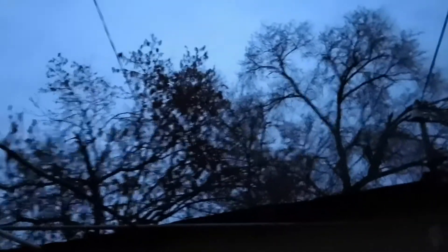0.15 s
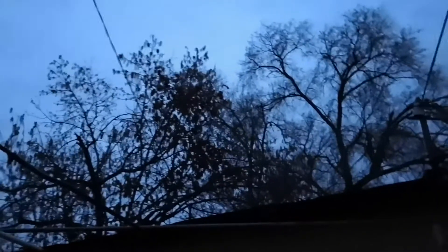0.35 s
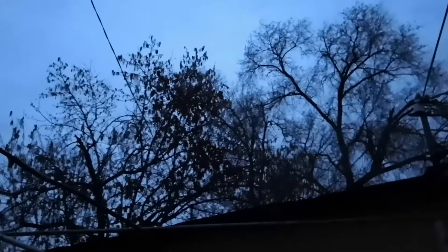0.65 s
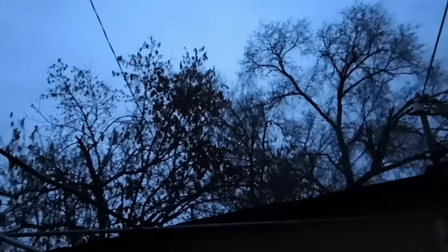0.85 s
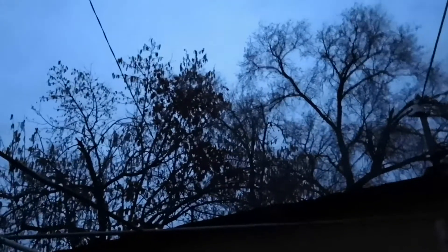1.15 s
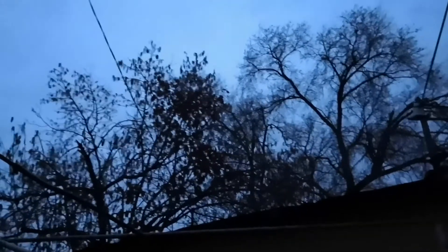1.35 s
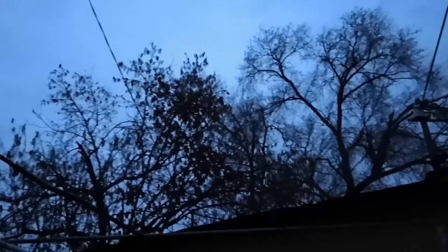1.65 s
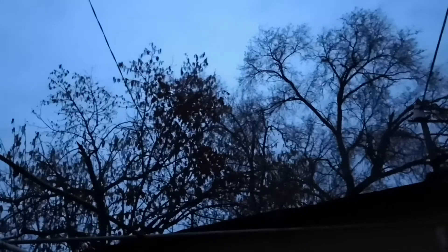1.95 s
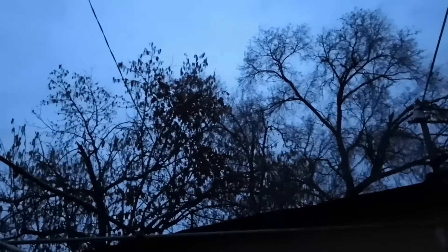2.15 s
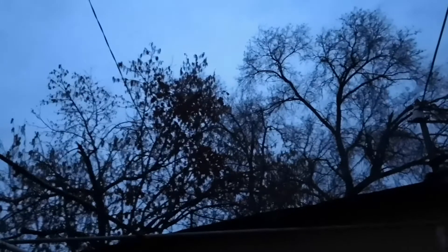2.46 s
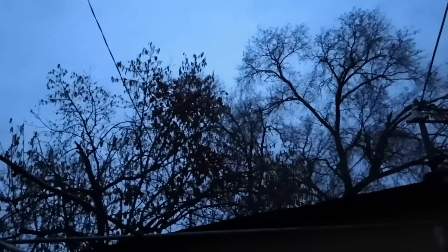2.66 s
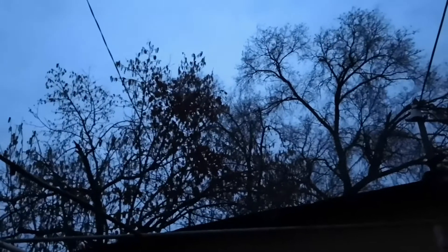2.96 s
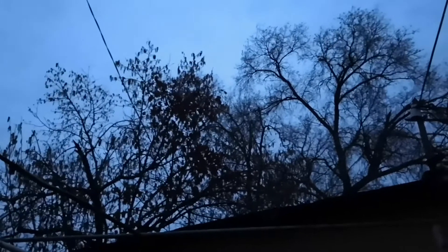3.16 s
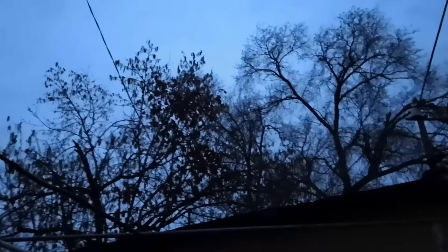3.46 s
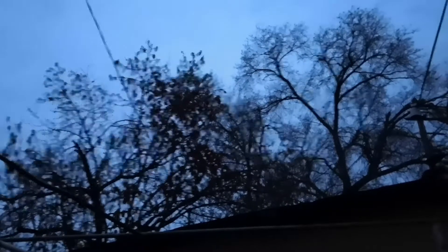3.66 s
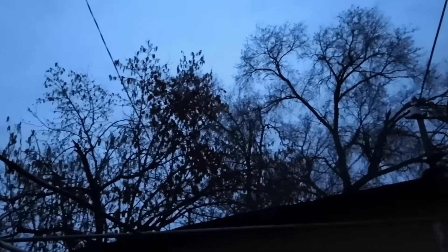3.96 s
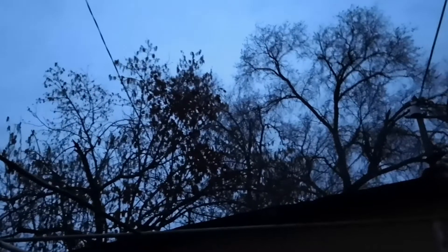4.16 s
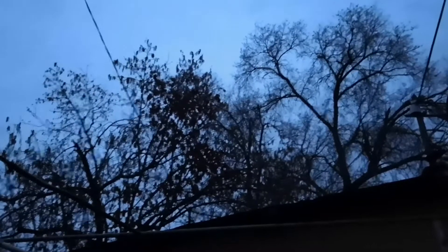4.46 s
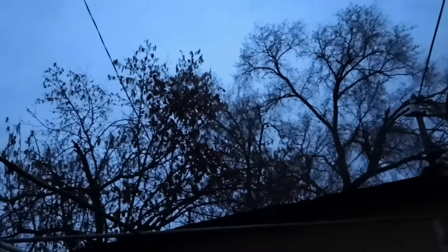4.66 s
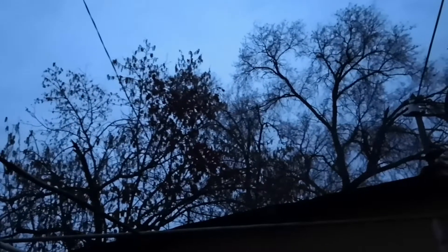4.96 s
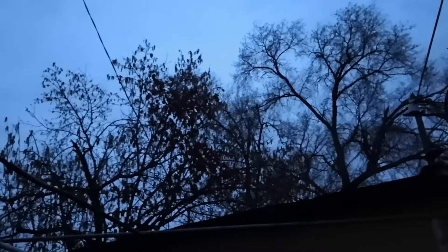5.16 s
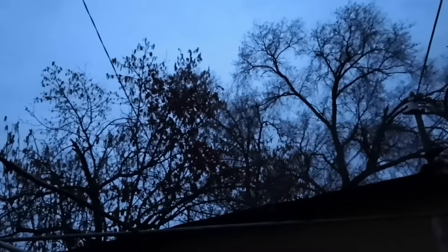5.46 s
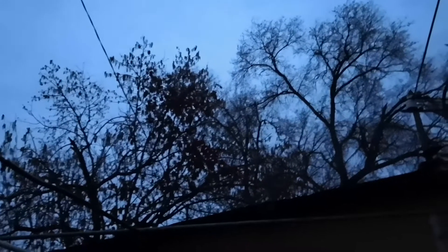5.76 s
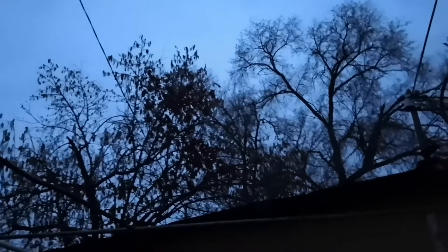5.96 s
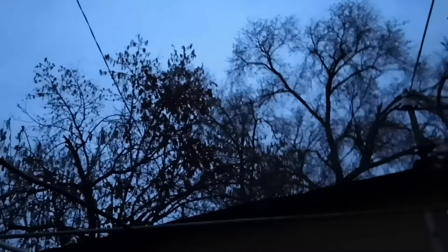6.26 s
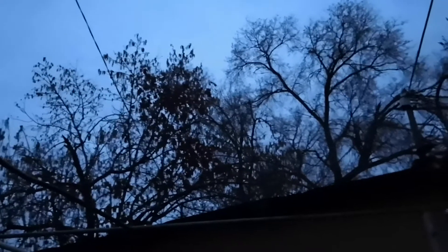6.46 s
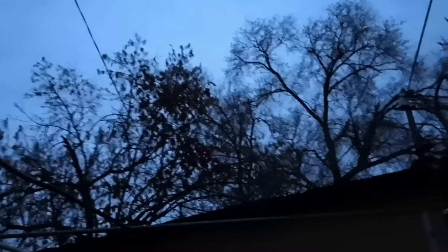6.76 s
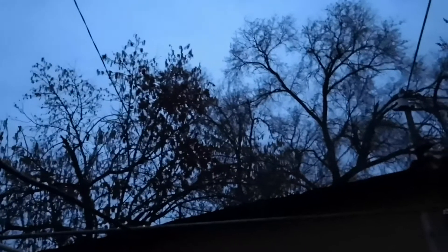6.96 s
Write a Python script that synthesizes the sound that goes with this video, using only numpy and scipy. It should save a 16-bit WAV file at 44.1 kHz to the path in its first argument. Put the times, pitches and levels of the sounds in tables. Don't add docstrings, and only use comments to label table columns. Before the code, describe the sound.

A blackbird sings from a bare tree some way off, slightly left. Blurred distant bird murmurs come first, then short mellow whistles and warbles, a run of tiny falling squeaks, and a long rising whistle with a high trill, repeated louder. A dense loud phrase ends in thin hooked squeaks. Walls echo every note; faint town hum, far birds and soft regular ticks lie beneath a small stereo handheld microphone.

```python
import sys
import numpy as np
from scipy import signal
from scipy.io import wavfile
from scipy.ndimage import uniform_filter1d

SR = 44100
rng = np.random.default_rng(int(sys.argv[2]) if len(sys.argv) > 2 else 0)


def digitize_waveform(pressure):
    field = np.atleast_2d(pressure).T
    bounded = np.clip(field, -1, 1)
    quanta = np.round(bounded * 32767).astype(np.int16)
    wavfile.write(sys.argv[1], SR, quanta)


def decibels_to_gain(level_db):
    exponent = np.asarray(level_db, float) / 20
    return 10 ** exponent


N = 313992


def evened(x):
    return x / np.sqrt(np.mean(x ** 2) + 1e-20)


def read(points, hz):
    f, value = np.transpose(points)
    return np.interp(np.log(hz + 1), np.log(f + 1), value)


def add(mix, s, sound):
    part = mix[..., round(s * SR):][..., :sound.shape[-1]]
    part += sound[..., :part.shape[-1]]


# (frequency [Hz], density [dB per Hz])
HUM = [(12, -35), (20, -7.5), (120, 5), (160, -17), (181, 9), (238, -7), (335, -14), (367, -11.5),
       (619, -26), (702, -6.5), (769, -18.5), (857, -14), (1500, -16), (1950, -44), (3300, -120)]
# (frequency [Hz], density [dB per Hz])
AIR = [(880, -11), (1500, -6), (1690, 2.5), (1840, 2.5), (2280, -0.5), (2450, 0), (3160, -3), (3450, -8),
       (4360, -16.5), (4850, -14.5), (5400, -11.5), (6380, -18), (7250, -15), (8230, -20.5), (15600, -28.5)]
# (frequency [Hz], likeness [0-1])
PORT_LIKENESS = [(30, .999), (80, .995), (170, .93), (350, .75), (700, .68), (1400, .52), (3000, .5),
                 (8000, .35), (14000, .1)]
# (frequency [Hz], left-right level [dB])
PORT_LEAN = [(200, -0.5), (400, -0.5), (700, 7), (1200, -1.5), (2400, -1), (4400, -2), (8000, 1),
             (12000, 1)]
# (frequency [Hz], phase [rad])
PORT_TWIST = [(60, -.05), (170, -.1), (300, .45), (600, 1.3), (900, 0), (1300, -1.4), (2200, -1), (3000, 0)]
HUM_DB, AIR_DB = -59, -63
PORT_LAG = 16
SWELL_DB, PATCH_DB, CHORUS_DB = .5, 1.64, 1.6


def town():
    frames, hz = N // 256 + 5, np.fft.rfftfreq(1024, 1 / SR)[:, None]
    a, b, c, d, patches, swell = rng.standard_normal((frames, 513, 6)).T
    patches = uniform_filter1d(patches, size=3, axis=0)
    patches = evened(uniform_filter1d(patches, size=24, axis=1))
    swell = evened(uniform_filter1d(swell[0], size=90))
    chorus = np.exp(-(np.log((hz + 1) / 2200) / .5) ** 2)

    same = np.clip(read(PORT_LIKENESS, hz), 0, 1)
    lean = decibels_to_gain(.5 * read(PORT_LEAN, hz))
    lead = 2 * np.pi * hz * PORT_LAG / SR + read(PORT_TWIST, hz)
    right = a + 1j * b
    left = same * np.exp(1j * lead) * right + np.sqrt(1 - same ** 2) * (c + 1j * d)
    summed = np.sqrt(lean ** 2 + lean ** -2. + 2 * same * np.cos(lead)) / 2

    hum = decibels_to_gain(HUM_DB) * evened(decibels_to_gain(read(HUM, hz)))
    air = decibels_to_gain(AIR_DB) * evened(decibels_to_gain(read(AIR, hz)))
    shape = np.hypot(hum, air)
    motion_db = (PATCH_DB + CHORUS_DB * chorus) * patches + SWELL_DB * swell
    colour = shape * decibels_to_gain(motion_db) / summed
    spectra = np.array([lean * left, right / lean]) * colour
    pair = signal.istft(spectra, nperseg=1024, noverlap=768)[1][:, :N]
    return np.sqrt(np.mean(shape ** 2)) * pair / np.std(pair.mean(0))


# (time [s], peak level [dB])
TICKS = [(0.159, -66.5), (0.7794, -63.5), (1.4391, -65.5), (1.9894, -64.5), (2.6256, -65.5), (3.238, -63),
         (3.8228, -66.5), (4.4428, -67), (5.0294, -64.5), (5.6302, -66.5), (6.2346, -79), (6.8366, -70)]
# (frequency [Hz], level [dB], decay t60 [s])
TICK_MODES = [(1880, 20, 0.006), (3280, -8, 0.0033), (5400, -10.5, 0.012), (7000, -21, 0.012),
              (8500, -12.5, 0.0075)]


def ticks():
    t, out = np.arange(1500) / SR, np.zeros((2, N))
    ring = sum(decibels_to_gain(db - 60 * t / t60) * np.sin(2 * np.pi * hz * t) for hz, db, t60 in TICK_MODES)
    ring[0] = 1.5
    for (s, db), rattle in zip(TICKS, rng.standard_normal((len(TICKS), 2, 1500))):
        shake = np.diff(rattle, prepend=0) * decibels_to_gain(-60 * t / 0.065)
        add(out, s, decibels_to_gain(db - 0.5) * signal.fftconvolve(shake, ring[None], axes=1))
    return out


# (start [s], length [s], centre [Hz], swing depth [Hz], level [dB])
FAR = [
    (0.096, 0.23, 1290, 90, -60),
    (0.227, 0.12, 1800, 90, -64),
    (0.456, 0.2, 2052, 110, -56),
]
FAR_SWELL_DB = -7.5


def distant(start, length, hz, depth_hz, db):
    return [(start, hz, db + FAR_SWELL_DB, depth_hz),
            (start + .7 * length, hz, db, depth_hz),
            (start + length, hz, db + FAR_SWELL_DB, depth_hz)]


# (start [s], length [s], from [Hz], to [Hz], level [dB])
WHISTLES = [(0.77, 0.042, 2252, 2213, -45), (0.869, 0.094, 2238, 2096, -45.5),
            (0.831, 0.023, 2684, 2660, -55), (1.078, 0.095, 1919, 1836, -46.5),
            (1.221, .105, 2717, 2925, -53), (1.865, 0.05, 1917, 2072, -53),
            (3.192, 0.063, 2592, 2626, -50.5), (3.328, 0.052, 2310, 2250, -57.5),
            (3.653, 0.22, 2805, 2940, -69), (4.475, 0.058, 2500, 2530, -49.5),
            (4.698, 0.048, 2717, 2726, -47.5), (5.096, 0.097, 2170, 2325, -63),
            (5.385, 0.066, 2200, 2376, -56), (5.439, 0.067, 2380, 2453, -42),
            (5.748, 0.23, 2044, 2098, -48), (5.82, 0.122, 2400, 2450, -40.5), (6.027, .14, 6720, 6680, -71),
            (6.134, 0.075, 3110, 3248, -43), (6.346, 0.032, 2498, 2480, -50),
            (6.374, 0.051, 2049, 2090, -49), (6.539, 0.066, 2085, 2070, -41.5)]
# (start [s], length [s], from [Hz], to [Hz], level [dB])
REEDS = [
    (3.158, 0.055, 2103, 1918, -51.5),
    (4.663, 0.066, 2117, 1922, -52.5),
    (6.008, .135, 2717, 2994, -49),
]
# (start [s], length [s], from [Hz], to [Hz], level [dB])
NASALS = [
    (3.091, .07, 3150, 2820, -57),
    (4.589, .075, 3198, 2880, -54),
]
SCOOP_S, SCOOP, SCOOP_DB = 0.0135, 0.0595, -6.5
TREMBLE_HZ, TREMBLE_PER_S, NASAL_HZ, NASAL_PER_S = 21, 30.8, 50, 65
WHISTLE_FADE_DB = -0.5


def whistle(start, length, from_hz, to_hz, db, tremble_hz=TREMBLE_HZ):
    return [(start, from_hz * (1 - SCOOP), db + SCOOP_DB, tremble_hz),
            (start + SCOOP_S, from_hz, db, tremble_hz),
            (start + length, to_hz, db + WHISTLE_FADE_DB, tremble_hz)]


# (start [s], length [s], centre [Hz], swing depth [Hz], level [dB])
WARBLES = [
    (0.637, 0.085, 2670, 143, -55),
    (0.699, 0.22, 2420, 173, -54),
    (1.322, 0.11, 2800, 170, -53.5),
    (5.511, 0.16, 2298, 324, -43.5),
    (6.438, 0.11, 2243, 285, -43.5),
]
WARBLE_PER_S, WARBLE_OPENS, WARBLE_FADE_DB = 45, 0.346, -4.5


def warble(start, length, hz, depth_hz, db):
    return [(start, hz, db + 2, 0.39 * depth_hz),
            (start + WARBLE_OPENS * length, hz, db, depth_hz),
            (start + length, hz, db + WARBLE_FADE_DB, depth_hz)]


# (start [s], length [s], from [Hz], to [Hz], peak level [dB])
RISES = [
    (2.718, .295, 1840, 2476, -43),
    (4.215, .26, 1880, 2498, -39.5),
]
RISE_BEND, RISE_PEAK = 1.45, .8
RISE_GROW_DB, RISE_FADE_DB = -14.5, -3
RISE_WOBBLE_HZ, RISE_PER_S = 215, 33


def rise(start, length, from_hz, to_hz, db):
    u = np.arange(33) / 32
    left = np.clip(1 - u / RISE_PEAK, 0, 1)
    level = db + np.interp(u, [0, RISE_PEAK, 1], [RISE_GROW_DB, 0, RISE_FADE_DB])
    hz = to_hz + (from_hz - to_hz) * left ** RISE_BEND
    wobble_hz = -RISE_WOBBLE_HZ * np.minimum(2 * left, 1)
    return np.transpose([start + u * length, hz, level, wobble_hz])


# (trill start [s], length [s], from [Hz], to [Hz], level [dB])
TRILLS = [
    (3.316, 0.13, 5130, 4810, -47),
    (4.825, 0.1, 5550, 4956, -42),
]
TRILL_PER_S, TRILL_HZ, TRILL_FADE_DB = 30, 999, -10.5
BUZZ_S, BUZZ_HZ, BUZZ_DEPTH_HZ, BUZZ_PER_S, BUZZ_DB = .031, 7090, -720, 121, -2.5


def trill(start, length, from_hz, to_hz, db):
    buzz = [(start - BUZZ_S, BUZZ_HZ, db + BUZZ_DB - 2.5, BUZZ_DEPTH_HZ),
            (start, BUZZ_HZ, db + BUZZ_DB, BUZZ_DEPTH_HZ)]
    body = [(start, from_hz, db, 0.855 * TRILL_HZ),
            (start + 0.167 * length, from_hz, db, .9 * TRILL_HZ),
            (start + 0.45 * length, to_hz, db + .4 * TRILL_FADE_DB, TRILL_HZ),
            (start + length, to_hz, db + TRILL_FADE_DB, TRILL_HZ)]
    return buzz, body


# (start [s], hook top [Hz], level [dB], held pitch [Hz], held length [s])
HOOKS = [
    (6.672, 6270, -50.5, 5716, 0.046),
    (6.846, 6650, -52, 5570, 0.0375),
    (7.027, 6500, -55.5, 5500, 0.044),
]
HOOK_FROM, HOOK_SAG = .84, .96
HOOK_UP_S, HOOK_TOP_S, HOOK_DOWN_S, HOOK_LOW_HZ, HOOK_END_DB = .008, 0.012, 0.023, 3480, -5
HELD_AFTER_S, HELD_UP_S, HELD_LOW_HZ, HELD_CLIMB_HZ_PER_S, HELD_DB = .059, .008, 4450, 2400, 0.3


def hook(start, top_hz, db, held_hz, held):
    top, again = start + HOOK_UP_S, start + HELD_AFTER_S
    fall = top + HOOK_TOP_S
    stroke = [(start, HOOK_FROM * top_hz, db - 9, 0),
              (top, top_hz, db, 0),
              (fall, HOOK_SAG * top_hz, db, 0),
              (fall + HOOK_DOWN_S, HOOK_LOW_HZ, db + HOOK_END_DB, 0)]
    flat = [(again, HELD_LOW_HZ, db + HELD_DB - 1, 0),
            (again + HELD_UP_S, held_hz, db + HELD_DB, 0),
            (again + held, held_hz + HELD_CLIMB_HZ_PER_S * held, db + HELD_DB, 0)]
    return stroke, flat


CLEAR_DB, RISE_DB = (-36, -52), (-32, -55)
REEDY_DB, NASAL_DB, TRILL_DB = (-13.5, -33), (-2.1, -12.5), (-27.5, -48)


def score():
    notes = [(TREMBLE_PER_S, CLEAR_DB, whistle(*row)) for row in WHISTLES]
    notes += [(TREMBLE_PER_S, REEDY_DB, whistle(*row)) for row in REEDS]
    notes += [(NASAL_PER_S, NASAL_DB, whistle(*row, NASAL_HZ)) for row in NASALS]
    notes += [(WARBLE_PER_S, CLEAR_DB, warble(*row)) for row in WARBLES]
    notes += [(WARBLE_PER_S, CLEAR_DB, distant(*row)) for row in FAR]
    notes += [(RISE_PER_S, RISE_DB, rise(*row)) for row in RISES]
    for row in TRILLS:
        buzz, body = trill(*row)
        notes += [(BUZZ_PER_S, CLEAR_DB, buzz), (TRILL_PER_S, TRILL_DB, body)]
    for row in HOOKS:
        notes += [(0, CLEAR_DB, part) for part in hook(*row)]
    return notes


# (frequency [Hz], level [dB])
THROAT = [(3000, -1.58), (3900, -4), (4500, -1), (5100, -0.5), (5900, -2.3), (6500, -3.5), (7200, -5.5)]


def note(voice, rows, unsteady):
    swing_per_s, second_db, third_db, pan_db = voice
    s, *columns = np.transpose(rows)
    t = np.arange(s[0], s[-1], 1 / SR)
    hz, db, depth = (np.interp(t, s, c) for c in columns)
    hz = uniform_filter1d(hz, size=150) + depth * np.cos(2 * np.pi * swing_per_s * (t - s[0]))
    waver, flutter = unsteady[:, np.minimum((t * SR).astype(int), N - 1)]
    hz = hz * (1 + 0.0048 * waver)
    db = db + 1.16 * flutter + read(THROAT, hz)
    turn = 2 * np.pi * np.cumsum(hz) / SR
    tone = np.sin(turn) + decibels_to_gain(second_db) * np.sin(2 * turn) + decibels_to_gain(third_db) * np.sin(3 * turn)
    ends = np.clip(np.minimum(t - s[0], s[-1] - t) / 0.0043, 0, 1)
    pan = decibels_to_gain(np.array([[.5], [-.5]]) * pan_db)
    return s[0], np.sqrt(2) * decibels_to_gain(db) * tone * ends * pan


# (first [s], last [s], spacing [s], top [Hz], level [dB])
SQUEAKS = [
    (1.496, 1.601, 0.015, 6150, -60.5),
    (1.499, 1.595, 0.019, 8120, -59.5),
    (1.595, 1.682, 0.045, 7000, -56.5),
    (1.683, 1.79, .018, 6170, -65.5),
    (1.704, 1.78, .015, 7920, -62),
    (1.774, 1.85, 0.033, 7040, -65.5),
    (1.931, 2.06, 0.031, 4795, -56),
    (2.092, 2.4, 0.051, 4470, -66.5),
    (2.021, 2.196, 0.061, 6500, -73.5),
]
SQUEAK_S, SQUEAK_FALL_HZ, QUICKEN = 0.0094, 1580, .94


def squeaks(song, unsteady):
    u = np.linspace(1, 0, round(SQUEAK_S * SR))
    for first, last, spacing, top_hz, db in SQUEAKS:
        starts = first + np.cumsum(spacing * QUICKEN ** np.arange(20)) - spacing
        for s in starts[starts < last]:
            along = (s - first) / (last - first)
            late, louder = unsteady[:, round(s * SR)]
            end_hz = (top_hz - SQUEAK_FALL_HZ) * (1 + 0.107 * along)
            hz = end_hz + (top_hz - end_hz) * u ** 2.2
            swell_db = 11.0 - 6.8 * (along - .8) ** 2 + 0.7 * louder
            level = decibels_to_gain(db + swell_db - 5.1 * u ** 2 + read(THROAT, hz))
            squeak = level * np.sin(2 * np.pi * np.cumsum(hz) / SR)
            add(song, s + 0.00093 * late, squeak * signal.windows.tukey(len(u), .4))


# (frequency [Hz], left-right level [dB])
SONG_LEAN = [(1340, 6.5), (1800, -13.5), (2060, -4), (2450, 3.5), (2850, -1), (5200, -2), (5900, -6),
             (7300, -3.5)]


def blackbird():
    song = np.zeros((2, N))
    unsteady = evened(uniform_filter1d(rng.standard_normal((N, 2)).T, size=300))
    for rate, tone_db, rows in score():
        pan_db = read(SONG_LEAN, np.mean(rows, axis=0)[1])
        add(song, *note((rate, *tone_db, pan_db), rows, unsteady))
    squeaks(song, unsteady)
    return decibels_to_gain(np.array([[4.0], [2.2]])) * song


ECHO_PEAK_S, ECHO_PEAK_DB, EARLY_T60 = 0.036, 4, 0.39
LATE_DB, LATE_T60 = -25, 1.7
WALL_S, WALL_SPREAD_S, WALL_DB = 0.0725, 0.0033, -1.5
SONG_LAG = 6


def yard(song):
    size = round(.7 * SR)
    taps = np.zeros((2, size))
    slots = np.arange(100, size - 30, 30)
    at = slots + rng.integers(0, 30, (2, len(slots)))
    np.put_along_axis(taps, at, rng.standard_normal(at.shape), 1)
    t = np.arange(size) / SR
    after = t - ECHO_PEAK_S
    dying = decibels_to_gain(ECHO_PEAK_DB - 60 * after / EARLY_T60) + decibels_to_gain(LATE_DB - 60 * after / LATE_T60)
    dying += decibels_to_gain(WALL_DB) * np.exp(-((t - WALL_S) / WALL_SPREAD_S) ** 2)
    build_db = 10.01 * np.minimum(after, 0) / ECHO_PEAK_S
    taps *= dying * decibels_to_gain(build_db - 23)
    direct = decibels_to_gain(-6.0) * 0.47 ** np.arange(12)
    taps[0, :12] = direct
    taps[1, SONG_LAG:SONG_LAG + 12] = direct
    return signal.fftconvolve(song, taps, axes=1)[:, :N]


def scene():
    return town() + ticks() + yard(blackbird())


def top_cut(x):
    return signal.sosfilt(signal.butter(12, 15700, fs=SR, output="sos"), x)


def record(dry):
    power = abs(uniform_filter1d((dry ** 2).mean(0), size=1500))
    power_db = 10 * np.log10(power + 1e-12)
    open_db = 0.21 * np.clip(power_db + 57.5, 0, 30)
    opened = dry * decibels_to_gain(uniform_filter1d(open_db, size=1500))
    return top_cut(opened - .0005)


dry = scene()
out = record(dry)
digitize_waveform(out)
```